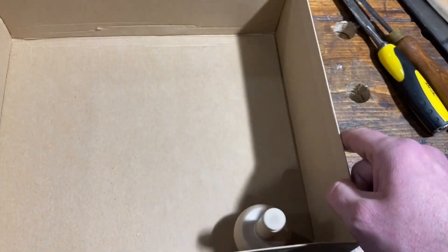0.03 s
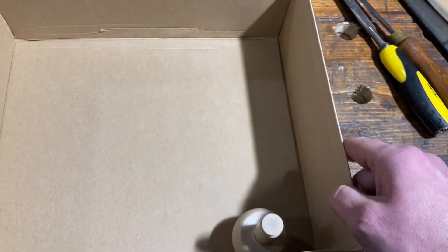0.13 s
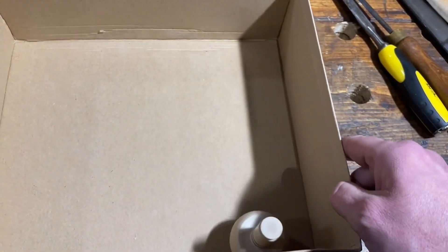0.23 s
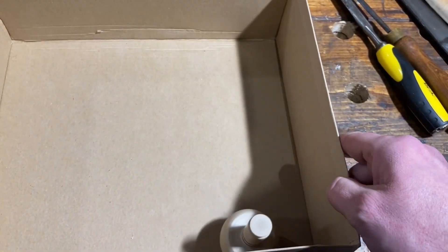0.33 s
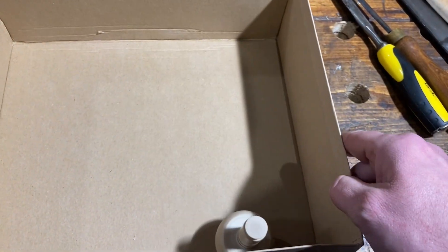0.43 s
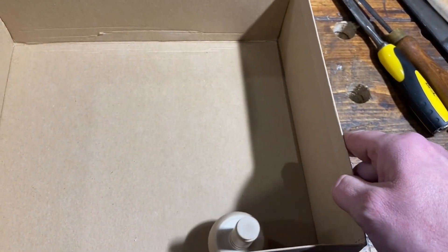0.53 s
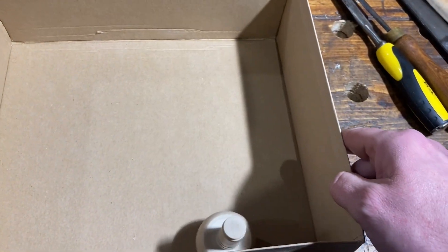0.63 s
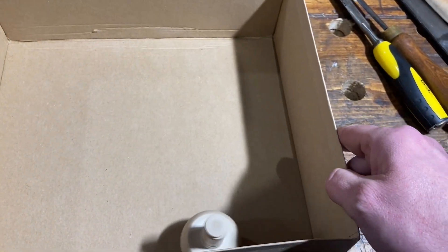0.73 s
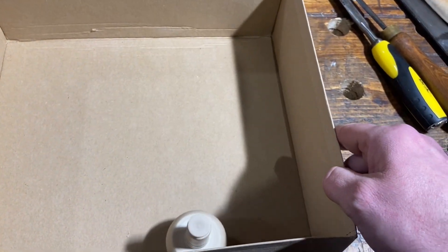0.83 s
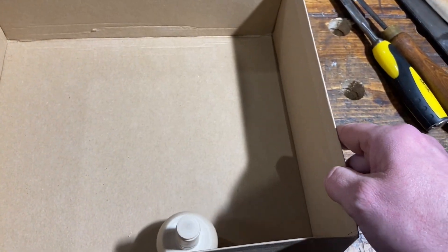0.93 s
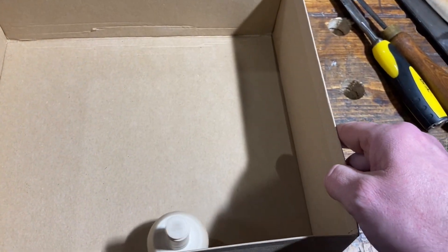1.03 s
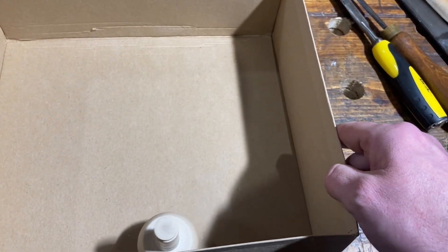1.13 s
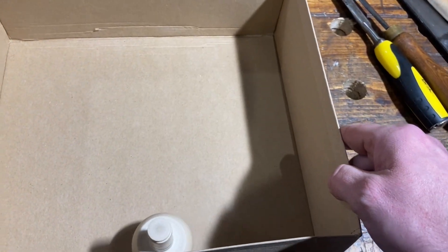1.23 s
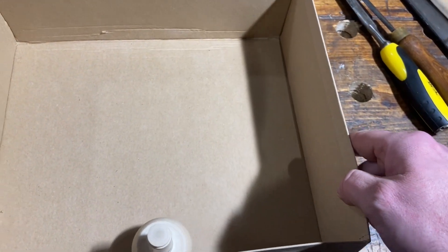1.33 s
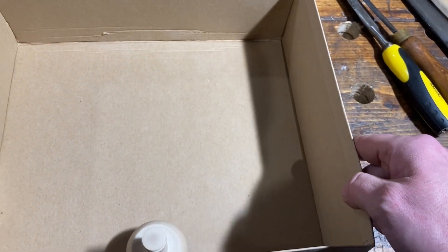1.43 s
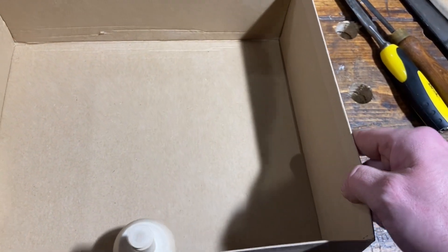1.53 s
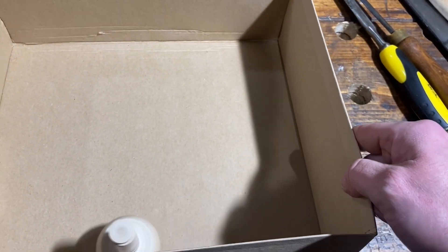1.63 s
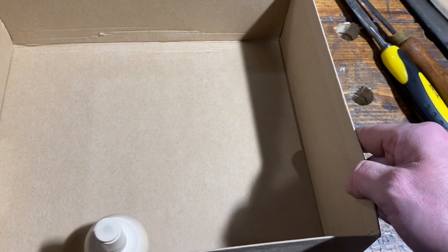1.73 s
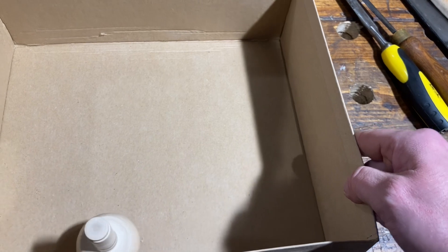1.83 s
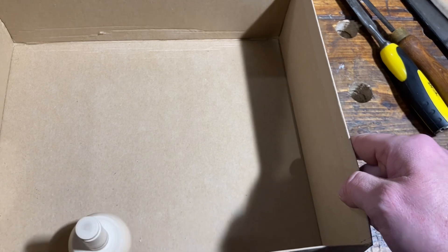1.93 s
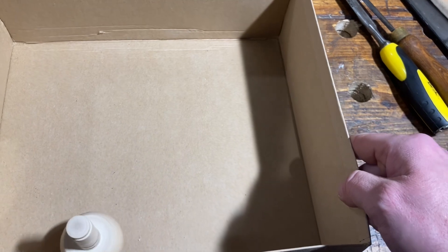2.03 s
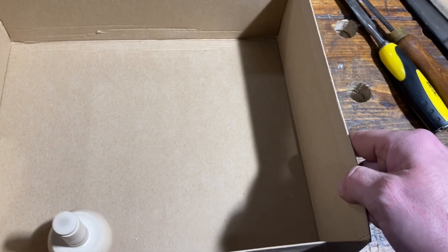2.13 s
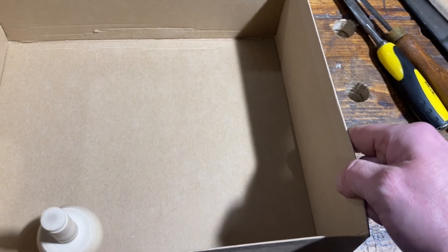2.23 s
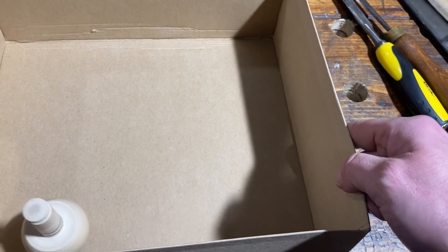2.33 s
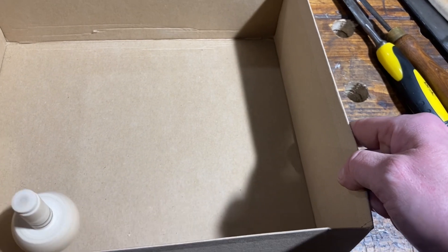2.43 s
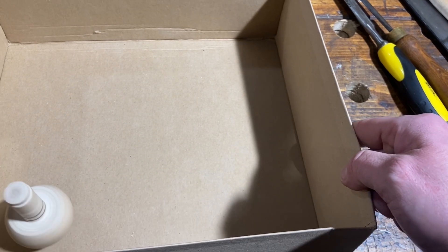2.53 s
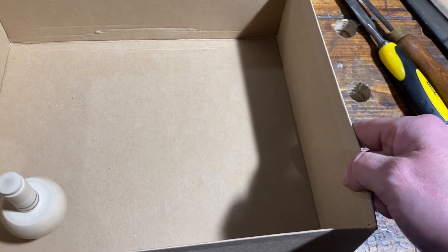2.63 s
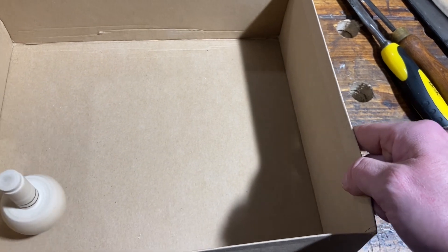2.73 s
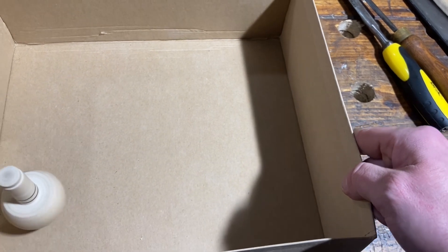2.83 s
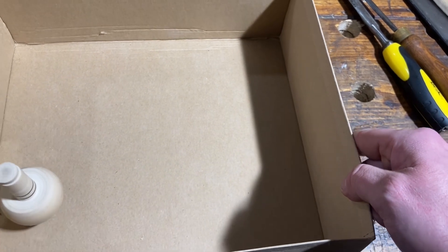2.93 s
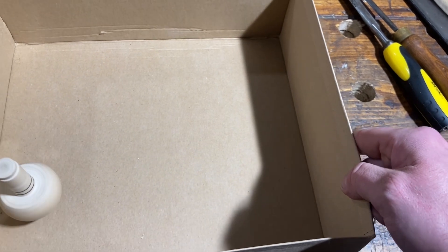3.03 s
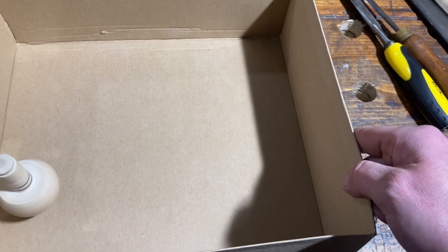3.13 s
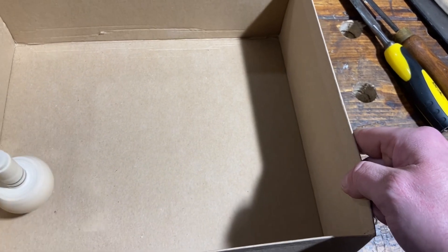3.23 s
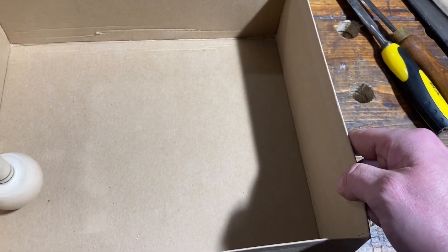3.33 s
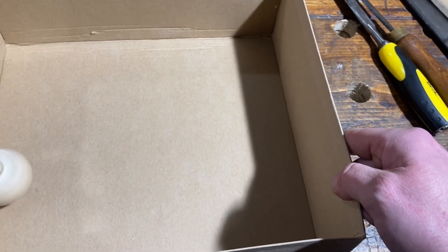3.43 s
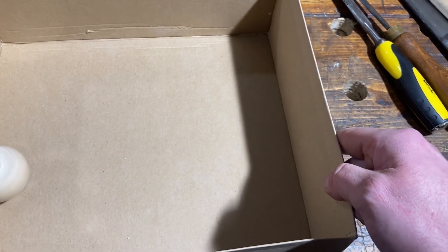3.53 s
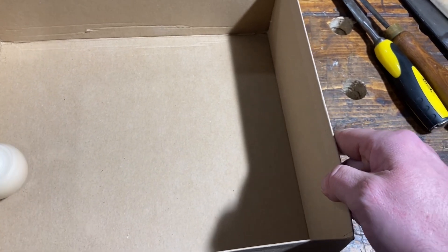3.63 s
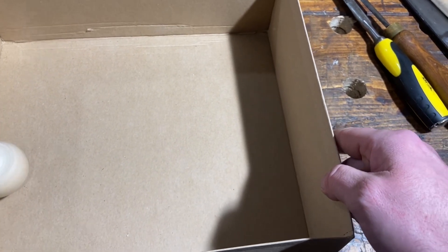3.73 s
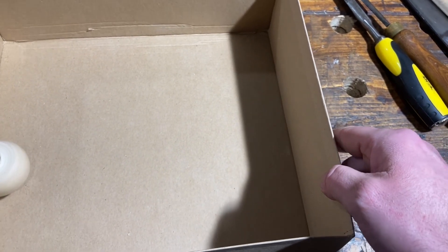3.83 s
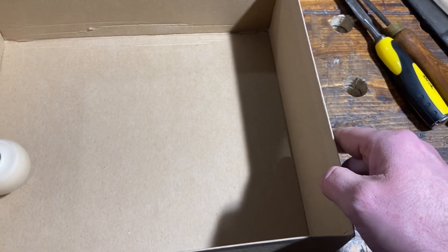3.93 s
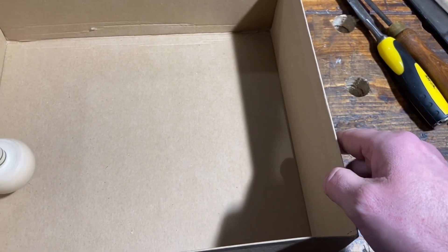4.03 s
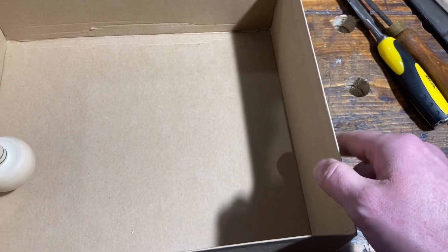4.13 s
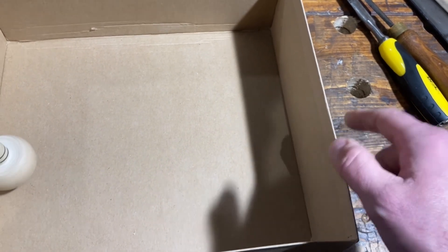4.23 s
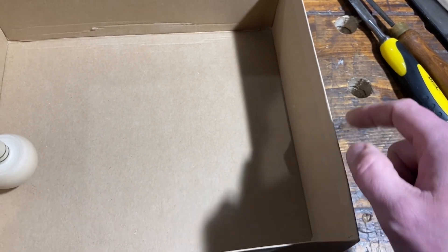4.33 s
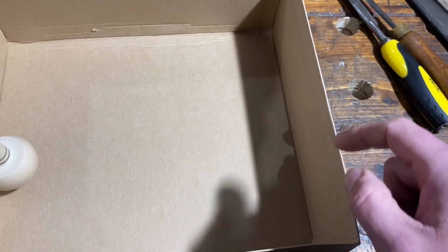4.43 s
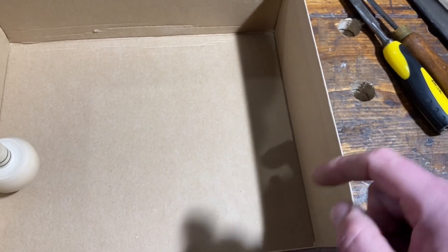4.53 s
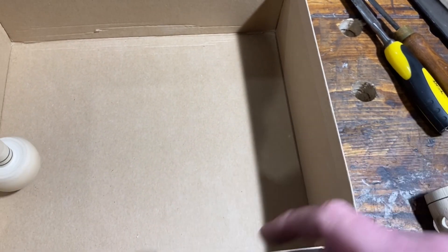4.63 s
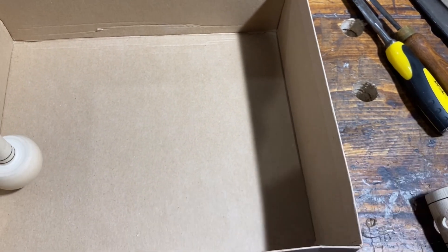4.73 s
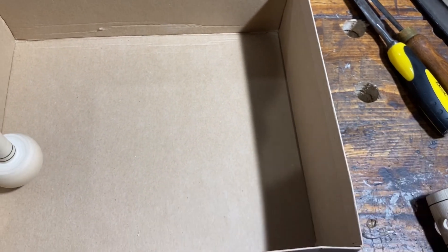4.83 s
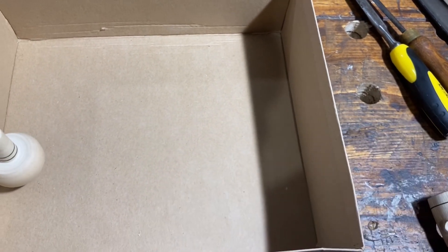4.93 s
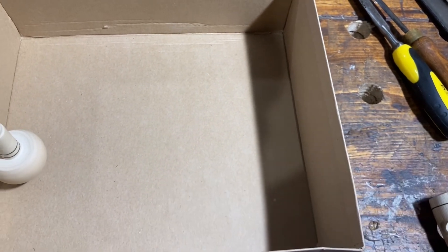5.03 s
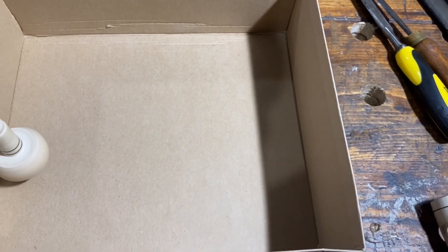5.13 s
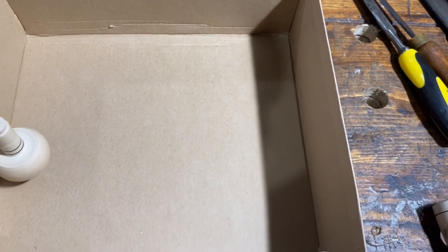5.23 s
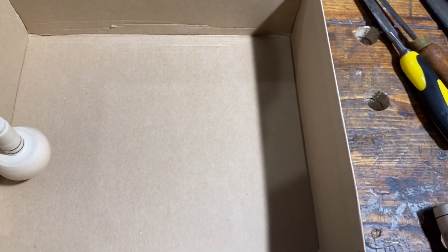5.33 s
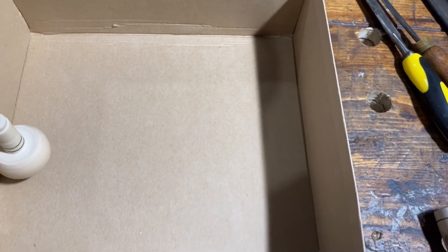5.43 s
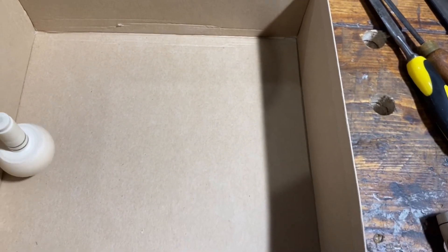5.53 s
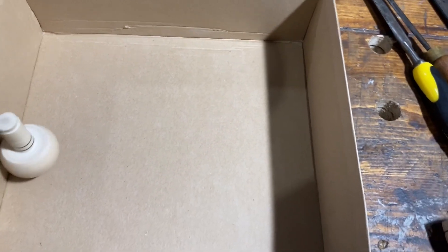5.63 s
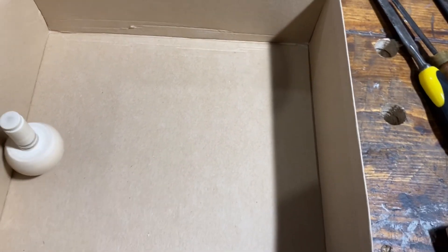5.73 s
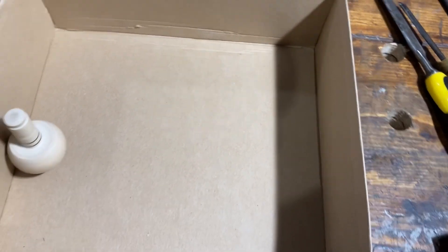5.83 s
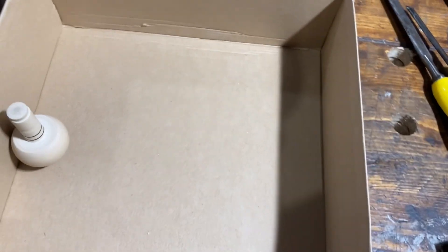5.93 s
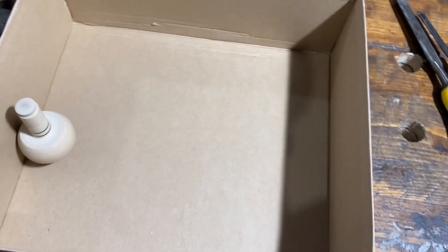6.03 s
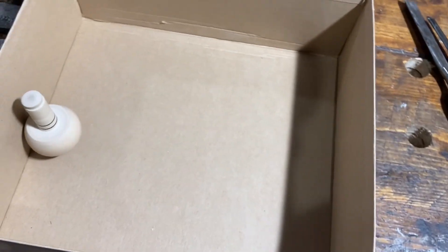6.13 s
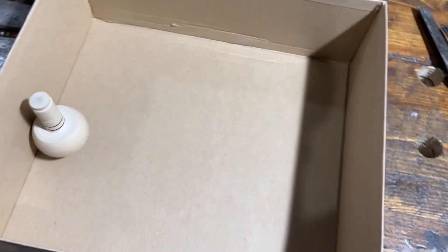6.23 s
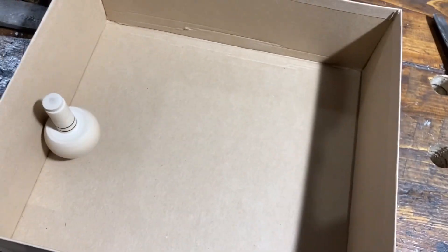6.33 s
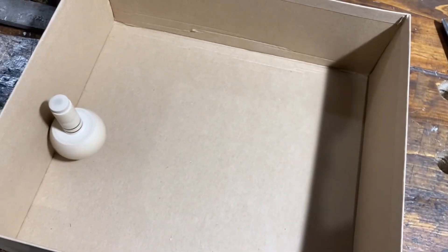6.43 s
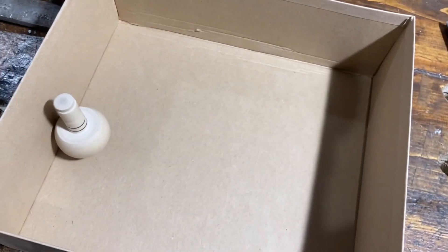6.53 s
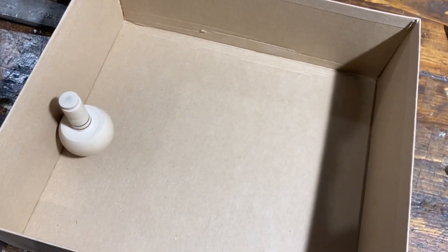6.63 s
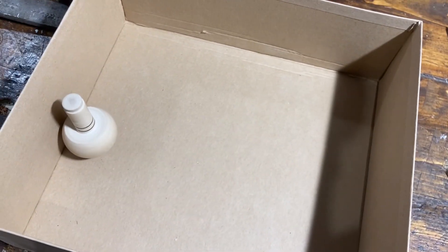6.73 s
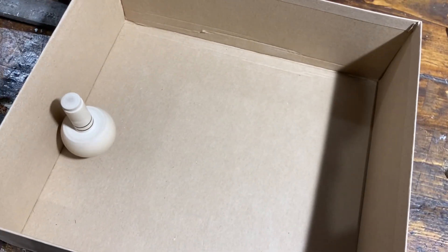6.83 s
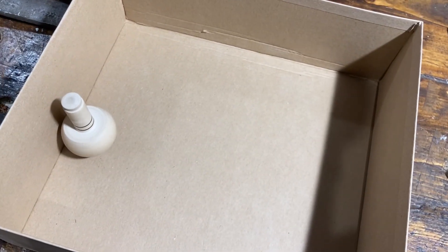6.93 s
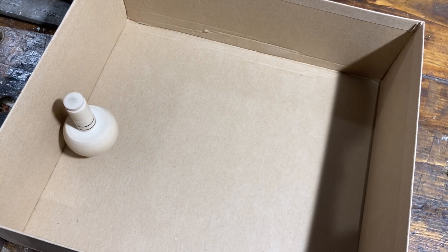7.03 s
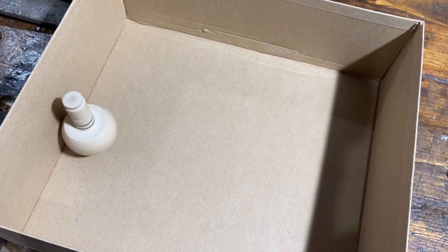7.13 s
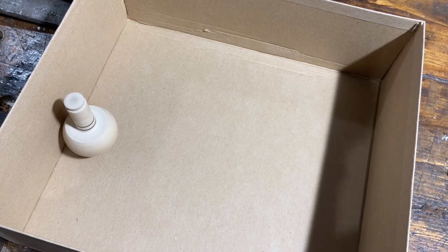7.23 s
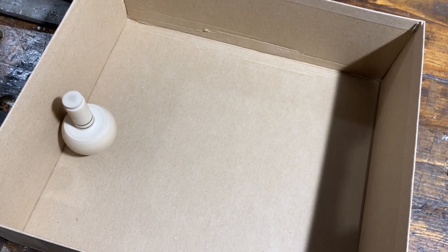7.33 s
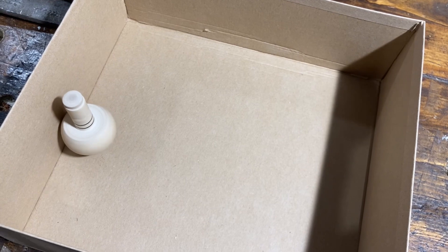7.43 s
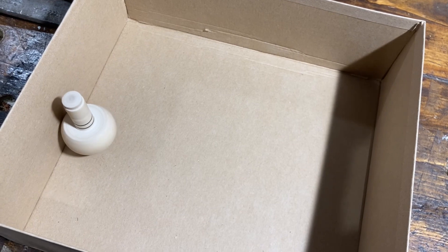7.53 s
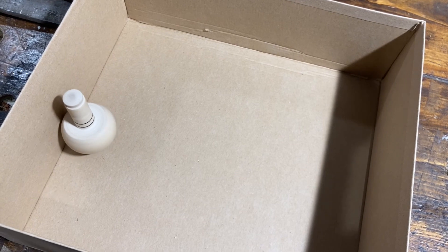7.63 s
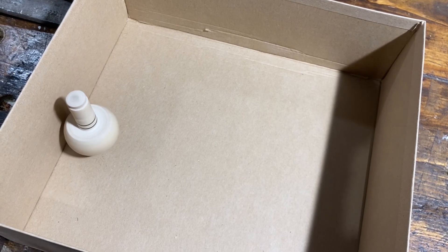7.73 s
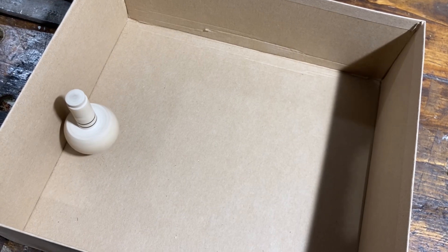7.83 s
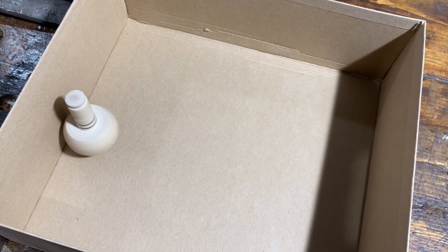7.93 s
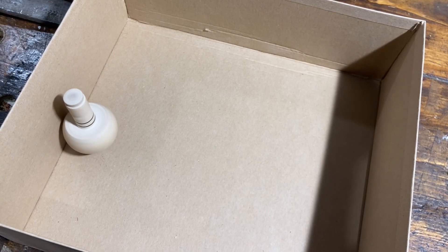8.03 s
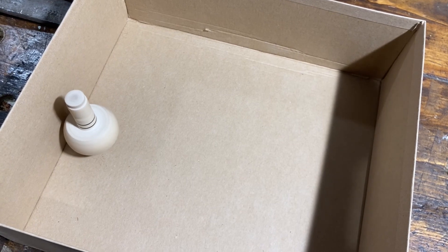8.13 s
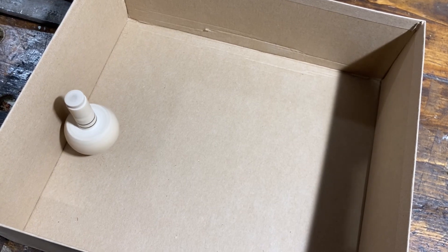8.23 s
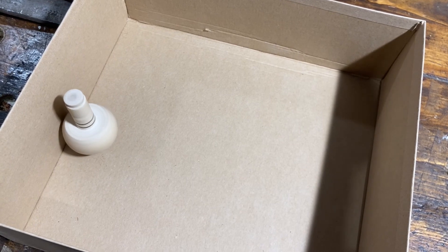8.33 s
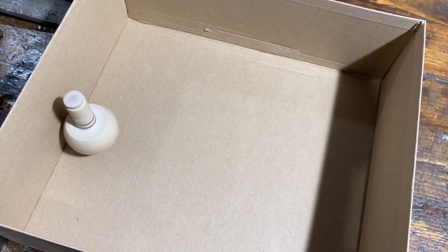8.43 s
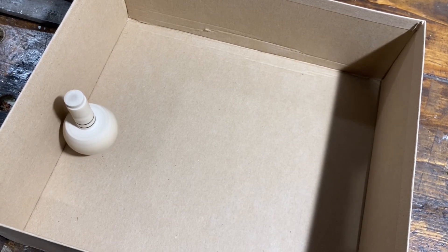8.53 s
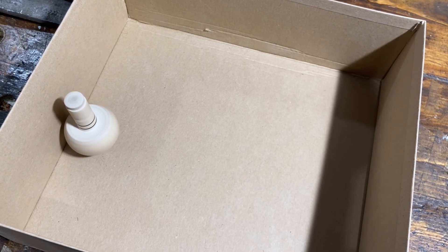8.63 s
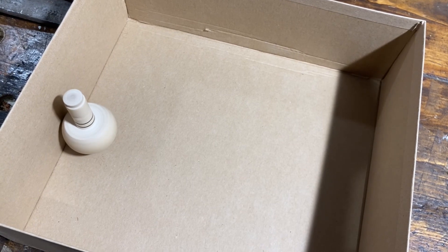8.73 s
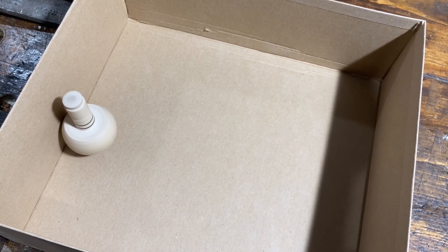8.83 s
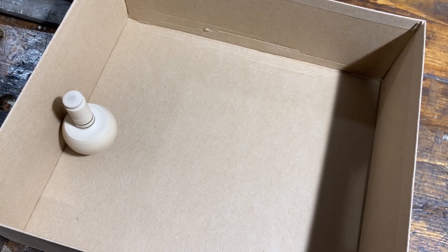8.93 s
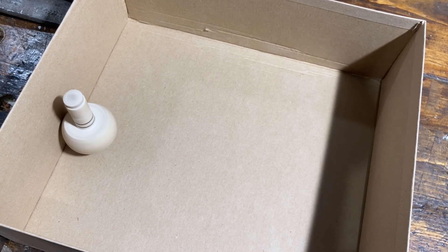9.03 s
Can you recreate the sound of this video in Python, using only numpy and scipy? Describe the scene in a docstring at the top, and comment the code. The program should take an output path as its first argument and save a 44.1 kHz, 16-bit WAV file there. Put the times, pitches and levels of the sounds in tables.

```python
"""Short rasps on cardboard come first, often several turns in a row, over the whirr of a spinning wooden top.
The top runs in a cardboard box on a workbench, close to a pair of microphones, and slowly loses speed.
Its tip grinds, skids and plucks over the box floor: filtered grainy noise, with a hum that follows the spin.
Its rim grazes the front wall, then the left: each stick-slip burst and shove rings that wall's resonances.
Dull bumps, brushing nods, a swelling hiss and steady room air fill in the rest."""
import sys
import numpy as np
from scipy import signal
from scipy.fft import rfft, irfft, next_fast_len
from scipy.io import wavfile

SR = 44100
rng = np.random.default_rng(int(sys.argv[2]) if len(sys.argv) > 2 else 0)


def transcribe(signal):
    """Save signal, clipped to [-1, 1], as a 16-bit WAV file at the path in sys.argv[1]."""
    frames = np.atleast_2d(signal).T
    limited = np.clip(frames, -1, 1)
    pcm = np.round(limited * 32767).astype(np.int16)
    wavfile.write(sys.argv[1], SR, pcm)


N = 400862
TIME = np.arange(N) / SR
CORNER_S = 2.5   # the top rounds the corner from the front wall to the left wall


def from_db(db):
    """Decibels to an amplitude factor."""
    return 10 ** (np.asarray(db) / 20)


def rms_one(x):
    """Scale a signal to an RMS of 1."""
    return x / np.sqrt(np.mean(x ** 2) + 1e-20)


def in_time(rows):
    """Each column of a curve at every sample."""
    s, *columns = np.transpose(rows)
    return [np.interp(TIME, s, column) for column in columns]


def swell(s, half_length):
    """A smooth rise and fall of height 1."""
    return np.exp(-np.minimum(((TIME - s) / half_length) ** 2, 50))


def add(out, s, sound):
    """Mix a short sound in at a time."""
    start = max(round(s * SR), 0)
    out[..., start:start + sound.shape[-1]] += sound[..., :N - start]


def lowpass(x, hz, order=2):
    """Take the treble off."""
    return signal.sosfilt(signal.butter(order, min(hz, .45 * SR), fs=SR, output="sos"), x)


def highpass(x, hz):
    """Take the bass off."""
    return signal.sosfilt(signal.butter(2, hz, "high", fs=SR, output="sos"), x)


def bandpass(x, low_hz, high_hz):
    """Keep one band."""
    return signal.sosfilt(signal.butter(2, [low_hz, high_hz], "band", fs=SR, output="sos"), x)


def waver(depth_db, hz):
    """A random level curve in dB that moves no faster than about this rate."""
    return depth_db * rms_one(lowpass(rng.standard_normal(N), hz))


def convolve(x, response):
    """Causal filtering, channel by channel."""
    return signal.oaconvolve(np.atleast_2d(x), np.atleast_2d(response), axes=1)[:, :N]


def causal(gain):
    """The promptest impulse response that has this gain over frequency."""
    cepstrum = irfft(np.log(gain + 1e-9))
    half = len(cepstrum) // 2
    cepstrum[1:half] *= 2
    cepstrum[half + 1:] = 0
    return irfft(np.exp(rfft(cepstrum)))


def body(spectrum, modes=(), size=16384):
    """Impulse response of a broad spectrum with resonances standing out of it."""
    hz = np.arange(size // 2 + 1) * SR / size + 1e-3
    points = np.array(spectrum)
    power = from_db(np.interp(np.log(hz), np.log(points[:, 0]), points[:, 1])) ** 2
    for centre, width, level in modes:
        detuning = (hz ** 2 - centre ** 2) / (hz * width)
        power = power + from_db(level) ** 2 / (1 + detuning ** 2)
    return causal(np.sqrt(power))


# colour of the room air: (frequency [Hz], relative level [dB])
AIR_COLOUR = [(20, -29), (42, -1.5), (70, 21.5), (150, 8), (500, 1.5), (1100, -6.5), (2000, -10.5),
              (3200, 0.5), (5000, -48.5), (16000, -75)]
AIR_DB = -65   # RMS level


def room_air():
    """Steady filtered noise, alike at both microphones in the bass, separate higher up."""
    apart = highpass(rng.standard_normal((2, N)), 630)
    shared = lowpass(rng.standard_normal(N), 290)
    return from_db(AIR_DB) * rms_one(convolve(apart + shared, body(AIR_COLOUR)))


# colour of the soft high hiss: (frequency [Hz], relative level [dB])
HISS_COLOUR = [(500, -25), (2900, -4), (4200, -3), (5500, -8), (7500, 0), (15500, -2)]
# swells of the hiss: (time of the height [s], half length [s], level before the trim [dB])
HISS_SWELLS = [(0.947, 0.074, -50), (1.802, 0.072, -71), (4.547, 0.32, -67.5), (4.993, 0.16, -52),
               (5.607, 0.44, -64.5), (7.345, 0.23, -63), (7.837, 0.37, -62), (9.002, 0.88, -63.5)]
HISS_REST_DB = -84.5   # between swells, before the trim


def hiss(trim_db):
    """Soft high noise whose swells add in power to a resting level."""
    power = from_db(HISS_REST_DB) ** 2
    for s, half_length, level_db in HISS_SWELLS:
        power = power + (from_db(level_db) * swell(s, half_length)) ** 2
    noise = rms_one(convolve(rng.standard_normal((2, N)), body(HISS_COLOUR)))
    return from_db(trim_db) * np.sqrt(power) * noise


def echoes(t60, gap_s, dull_hz):
    """Dense reflections that die away, different at each microphone; the furniture soaks up the treble."""
    t = TIME[:SR // 4]
    decay = from_db(-60 * t / t60) * (1 - np.exp(-(t / gap_s) ** 2))
    tail = rng.standard_normal((2, len(t))) * decay
    return lowpass(tail / np.sqrt(np.sum(tail ** 2, axis=1, keepdims=True)), dull_hz)


def space(room_db, thud_db, diffuse_hz):
    """Direct sound, then reflections of workshop, bench and box; the dull workshop tail lasts longest."""
    path = from_db(room_db) * lowpass(echoes(t60=.19, gap_s=.006, dull_hz=3400), 3400)
    # a bright slap off the bench, the same at both microphones
    path = path + from_db(-6.5) * echoes(t60=0.094, gap_s=0.0011, dull_hz=13200)[0]
    # the box walls reflect differently to each microphone
    path = path + from_db(-45.5) * echoes(t60=0.027, gap_s=0.00052, dull_hz=11800)
    # long waves reach both microphones alike
    shared = from_db(thud_db) * echoes(t60=0.15, gap_s=0.0087, dull_hz=diffuse_hz)[0]
    path = highpass(path, diffuse_hz) + shared
    path[:, 0] += 1   # direct sound
    return path


def boom(x, hz, width_hz, level_db):
    """A low mode of the room builds up slowly after each knock."""
    return from_db(level_db) * bandpass(x, hz - width_hz / 2, hz + width_hz / 2)


def thump(hz, level_db, peak_s):
    """A short low tone that swells and dies."""
    t = TIME[:SR // 4]
    envelope = t / peak_s * np.exp(1 - t / peak_s)
    return from_db(level_db) * envelope * np.sin(2 * np.pi * hz * t)


# soft dull bumps of the box: (time [s], frequency [Hz], level [dB], time to the peak [s])
BOX_BUMPS = [(0.125, 246, -57, 0.018), (1.716, 66.5, -43.5, 0.016), (5.69, 132, -52.5, 0.019),
             (5.773, 248, -61, 0.033), (5.845, 373, -56, 0.024), (6.19, 272, -61.5, 0.042),
             (6.215, 69.4, -53, 0.014), (6.435, 149, -56, 0.013), (6.655, 64, -41, 0.012),
             (7.5, 132, -58, .02), (7.628, 62.4, -40.5, 0.02)]
# the near corner rings with each touch until the top has left it; its level is relative to the touch
CORNER_RING_HZ, CORNER_RING_DB, CORNER_RING_S, CORNER_LEFT_S = 604, -7.5, 0.0026, 0.72
NOD_S, NODS_FROM_S = 0.072, 8.31   # the slowing top nods at this period; from this time six nods thump
NOD_HZ, NOD_DB, NOD_PEAK_S = 135.3, -56, 0.021   # the thump of one nod


def bumps():
    """Dull thumps of the box: stray ones, the ring of the near corner, and the nods of the top."""
    out = np.zeros(N)
    for s, hz, level_db, peak_s in BOX_BUMPS:
        add(out, s, thump(hz, level_db, peak_s))
    for s, level_db, *_ in touches():
        if s < CORNER_S:
            nearness = np.exp(-(s / CORNER_LEFT_S) ** 4)
            add(out, s, nearness * thump(CORNER_RING_HZ, level_db + CORNER_RING_DB, CORNER_RING_S))
    for k in range(6):
        add(out, NODS_FROM_S + k * NOD_S, thump(NOD_HZ, NOD_DB, NOD_PEAK_S))
    return out


NOD_DEPTH = .3   # share by which the brushing swells on each nod
BRUSH_UNEVEN_DB = 1.3   # slow waver of the brushing


def nodding(brush_db, low_hz, high_hz, height_s, half_length_s, uneven_db):
    """Late in the spin the tip brushes the cardboard, a little harder on every nod."""
    nod = 1 + NOD_DEPTH * np.cos(2 * np.pi * (TIME - NODS_FROM_S - NOD_PEAK_S) / NOD_S)
    brush = rms_one(bandpass(rng.standard_normal((2, N)), low_hz, high_hz))
    uneven = from_db(waver(uneven_db, 2.9))
    return from_db(brush_db) * swell(height_s, half_length_s) * uneven * nod * brush


SPIN_HZ, DRAG_HZ_PER_S = 81.24, .65   # the spin runs down steadily (turns per s)
EXTRA_SPIN_HZ, BRAKE_S = 9.5, 1.05   # the front wall brakes away the first extra speed


def spin(s):
    """Turns per second at a given time."""
    return SPIN_HZ - DRAG_HZ_PER_S * s + EXTRA_SPIN_HZ * np.exp(-s / BRAKE_S)


def tip_load(angle):
    """The tip presses harder once a turn, with a random flutter on top."""
    throb = np.exp(.55 * np.cos(angle))
    return rms_one(throb * from_db(waver(1.8, 35.0)))


# hum of the unbalanced top: (multiple of the spin, relative level [dB])
HUM_HARMONICS = [(1, -13.5), (2, -8.5), (3, -15.5), (4, -15)]
# the hum swells, then fades as the top settles upright: (time [s], level before the trim [dB])
HUM_LEVEL = [(0, -81), (.6, -38.5), (1.05, -39), (1.3, -59), (2.6, -55), (3.3, -58), (9, -63.5)]


def unbalance_hum(angle, trim_db):
    """Sines at multiples of the spin, each wavering slightly in level."""
    level_db, = in_time(HUM_LEVEL)
    hum = np.zeros(N)
    for k, harmonic_db in HUM_HARMONICS:
        hum += from_db(harmonic_db + waver(0.61, 2.5)) * np.sin(round(k) * angle)
    return from_db(level_db + trim_db) * hum


# colour of the rumble: (frequency [Hz], relative level [dB])
RUMBLE_COLOUR = [(20, -49.5), (45, -12.5), (100, -16), (400, -16.5), (900, -61.5), (4000, -68)]
# resonances of the rumble: (frequency [Hz], width [Hz], relative level [dB])
RUMBLE_MODES = [(59, 16, 2), (81.4, 7.4, 6), (140, 28, -4.5), (207, 45, 1), (249.4, 9.7, 4),
                (302, 18, -2.5)]


def floor_rumble(level_db):
    """The shaken box floor: noise through its low resonances."""
    shaking = convolve(rng.standard_normal(N), body(RUMBLE_COLOUR, RUMBLE_MODES))
    return from_db(level_db) * rms_one(lowpass(shaking, 320))


# colour of the whirr: (frequency [Hz], relative level [dB])
WHIRR_COLOUR = [(100, -42.5), (400, -27.5), (1300, -9.5), (2600, -4.5), (4200, -6), (8000, -7),
                (16000, -17)]
# resonances of the box floor: (frequency [Hz], width [Hz], relative level [dB])
FLOOR_MODES = [(458, 37, -1.5), (685, 95, -5), (934, 13, 7), (1228, 56, -2), (1530, 500, -8.5),
               (2020, 90, 0)]


def floor_whirr(grit, level_db):
    """Tiny catches of the tip ring the box floor."""
    return from_db(level_db) * rms_one(convolve(grit, body(WHIRR_COLOUR, FLOOR_MODES)))


# the tip skids in fluttering bursts and the floor's ring slides:
# (time of the strongest burst [s], half length [s], frequency [Hz], slide [Hz per s], half width [Hz], level [dB])
SKID_BURSTS = [(1.631, 0.027, 940, -72, 220, -56), (1.713, 0.076, 980, -30, 130, -53.5),
               (2.0, 0.58, 940, -32, 32, -63.5), (2.274, 0.013, 1000, -100, 247, -56),
               (2.43, 0.1, 900, -200, 130, -54.5), (2.563, 0.083, 830, -280, 149, -56.5),
               (2.726, .11, 830, -280, 226, -61.5), (3.296, .14, 1700, 194.5, 460, -64)]
FLUTTER_S, FLUTTER_DB = 0.065, 3.5   # the fast top nods at this period, pressing the tip down each time


def skids(grit):
    """A resonance whose centre follows the tip's place on the floor, pulsing with each nod."""
    out = np.zeros(N)
    for s, half_length, hz, hz_per_s, half_width_hz, level_db in SKID_BURSTS:
        near = abs(TIME - s) < 3 * half_length
        t = TIME[near] - s
        carrier = np.exp(2j * np.pi * np.cumsum(hz + hz_per_s * t) / SR)
        # shift the band to zero, narrow it there, shift it back
        ring = rms_one(np.real(lowpass(grit[near] / carrier, half_width_hz) * carrier))
        flutter_db = FLUTTER_DB * np.cos(2 * np.pi * t / FLUTTER_S)
        out[near] += from_db(level_db + flutter_db) * np.exp(-(t / half_length) ** 2) * ring
    return out


# colour of the low rub: (frequency [Hz], relative level [dB])
DRAG_COLOUR = [(80, -53), (220, 11), (330, 0.5), (480, -2), (620, -8.5), (1200, -2), (1800, -11),
               (5000, -29.5)]
# course of the low rub: (time [s], level before the floor's patches [dB])
DRAG_LEVEL = [(0, -67), (1.4, -58), (1.7, -56.5), (2.15, -62), (2.3, -55.5), (2.62, -59), (2.88, -66),
              (3.35, -59), (4.3, -83), (7, -80.5), (8.85, -73), (9.02, -81), (9.09, -60)]
CATCHES_PER_S, CATCH_SPREAD_DB = 260, 11   # plucked fibres at a load of 1, and the spread of their sizes
PATCHY_DB, PATCHES_HZ = 3, 11   # rough and smooth patches of the floor pass under the tip


def dragging(load):
    """While the tip travels it plucks fibres at random, more of them under load: a grainy low rub."""
    level_db, = in_time(DRAG_LEVEL)
    caught = rng.random(N) < CATCHES_PER_S * load / SR
    sizes = from_db(CATCH_SPREAD_DB * np.minimum(rng.exponential(1, N), 2)) * rng.choice([-1, 1], N)
    patches = from_db(waver(PATCHY_DB, PATCHES_HZ))
    return patches * from_db(level_db) * rms_one(convolve(caught * sizes, body(DRAG_COLOUR)))


# tip on the floor of the box: (time [s], rumble level before the trim [dB], whirr level before the trim [dB])
TIP_LEVELS = [(0, -43.5, -46), (.33, -53, -61), (.55, -55, -55.5), (1.4, -50, -56), (1.62, -48, -49),
              (2.15, -58, -54), (2.55, -48.5, -52.5), (2.88, -64, -56.5), (3.42, -58, -54),
              (4.1, -55.5, -53.5), (4.45, -67, -58.5), (4.85, -62, -57), (5.06, -54, -52),
              (5.25, -57.5, -62), (6.35, -64.5, -66.5), (6.7, -64, -60.5), (7.4, -67, -64), (8.8, -78, -74),
              (9.02, -76, -60), (9.09, -54, -46)]
GRAIN_DB = 4   # spread of the tiny catches that make the whirr


def tip(grain_db, whirr_db, rumble_db, hum_db):
    """The tip grinds over the fibres, harder once a turn, and the unbalance shakes the floor of the box."""
    rumble_level, whirr_level = in_time(TIP_LEVELS)
    angle = 2 * np.pi * np.cumsum(spin(TIME)) / SR
    load = tip_load(angle)
    grit = load * rng.standard_normal(N) * from_db(grain_db * rng.standard_normal(N))
    grinding = floor_whirr(grit, whirr_level + whirr_db) + skids(grit) + dragging(load)
    shaking = floor_rumble(rumble_level + rumble_db) + unbalance_hum(angle, hum_db)
    return grinding + shaking


# the rim meets a wall and touches it once a turn: (time [s], first touch, relative level [dB],
# change to the last touch [dB], touches [count], contact length [units of 1.4 ms],
# shove against the rasp [dB], brightness before the touch's own tilt [dB per octave],
# band that the spot favours or damps [Hz], by [dB])
RIM_GRAZES = [(0.0129, -18.5, 0, 1, 1.7, 2, -0.5, 575, 1), (0.2718, -19, 4, 1, 5.1, -4.5, -2, 895, -9),
              (0.4636, -26, 18, 1, 3.1, 4, 0, 2510, 4.5), (.595, -22, -1, 2, 3, 6, 1.5, 3800, -4.5),
              (0.619, -32, 3.5, 3, 3.1, 13, 4, 1350, -7), (0.668, -32, 9, 2, 2.9, 1, .5, 3900, -11),
              (0.7471, -23, 0, 3, 6.4, -0.5, 0, 3380, -4), (0.8578, -22.5, 7, 1, 1.3, 17, 3.5, 5300, -24),
              (0.8796, -24.5, 7, 1, 6.4, -9, -2, 1020, 3), (.905, -26, -2, 3, 4.6, 3, 1.5, 1000, 10),
              (0.9417, -22, -4.5, 4, 2.8, 9, 2, 560, -5.5), (0.9888, -18.5, -3.5, 1, 3.9, -12, 1, 570, 1),
              (1.039, -21.5, 0, 2, 2.7, 2, 1.5, 2000, 0.5), (1.136, -25.5, 4.5, 2, 3.15, -7.5, 0, 630, -7),
              (1.329, -23.5, 2, 2, 4.3, -6, 0, 4750, 4), (1.416, -33, 13, 2, 1.85, -2, -0.5, 640, -11),
              (3.452, -13, 2, 1, 7, -22, -.5, 1640, 6), (3.4581, -11.5, 0, 1, 4.9, 0, 0.5, 1500, 1),
              (3.589, -10, -10.5, 2, 5, -4, -0.5, 900, -2),
              (3.6413, -22, -2, 2, 3.9, -6.5, -2.5, 850, -6.5),
              (3.6942, -28.5, 8.5, 2, 5.6, -1, -1, 4400, -5),
              (3.758, -22, -3.5, 2, 3.7, 0.5, -1.5, 4150, 2),
              (3.8104, -22.5, -1.5, 2, 2.9, -6, -2.5, 927, -10.5),
              (3.8621, -24, 6, 2, 4, -6.5, -1, 4200, -2), (3.9397, -23.5, 13, 1, 3.2, 3, -1, 1436, 1),
              (4.043, -44, 0, 1, 3.5, -7.5, 5, 4200, -26), (4.2255, -20, 5, 2, 5.5, 1.5, -0.2, 1900, -1),
              (4.5396, -21.5, 1.5, 2, 7, -0.5, -1.5, 766, 0.5),
              (4.647, -28.5, 12, 2, 5.5, 2.5, -0.5, 470, -2.5), (4.966, -24, 3.5, 2, 4.1, -5, -1.5, 760, 3),
              (5.111, -16, -11.5, 2, 4.7, -5, -1.25, 4240, -4.5), (5.477, -23, -6, 1, 3.5, 0, -1, 622, 7),
              (5.6992, -46.5, -15, 1, .88, 10, 1, 1500, -2), (5.7767, -45, -13, 1, 5.2, -6, -4.5, 1500, -8),
              (6.0587, -25, 3, 2, 5.9, 2.5, -1.57, 4750, -8.5),
              (6.4601, -30, 10.5, 2, 3.2, -4.5, -1.5, 506, -4.5),
              (6.6347, -15.5, 0, 1, 4.7, -3.5, -0.8, 6500, -3.5),
              (7.6226, -16.5, 6, 1, 5.8, 0.5, -0.4, 2130, 2)]
EARLY_MS_PER_DB = 0.3   # a harder touch comes earlier in its turn
MID_RUN_SAG_DB = 1.5   # the middle touches of a run are lighter
FIRST_TILT, LATER_TILT = 0.64, -0.044   # brightness added to the first touch and to later ones (dB per octave)


def touches():
    """Each graze unrolled into one touch a turn: time, level, then the shape that graze() takes."""
    for s, first_db, change_db, count, length, shove_db, brightness, spot_hz, spot_db in RIM_GRAZES:
        for turn, part in enumerate(np.linspace(0, 1, max(round(count), 1))):
            level_db = first_db + change_db * part - MID_RUN_SAG_DB * np.sin(np.pi * part)
            when = s + turn / spin(s) - EARLY_MS_PER_DB * 1e-3 * change_db * part
            tilt = brightness + (LATER_TILT if turn else FIRST_TILT)
            yield when, level_db, length, tilt, shove_db, spot_hz, spot_db


def rubbing(rub_db, rub_s, low_hz, lean_db, lean_at_s, lean_half_s):
    """The rim brushes the wall lightly after each touch, harder while the top leans on the front wall."""
    kicks = np.zeros(N)
    for s, level_db, *_ in touches():
        add(kicks, s, from_db([level_db]) ** 2)
    # each kick's power dies away exponentially
    weight = np.sqrt(signal.lfilter([1], [1, -np.exp(-1 / (rub_s * SR))], kicks + 1e-18))
    brush = highpass(highpass(rng.standard_normal(N), low_hz), low_hz)
    return from_db(rub_db + lean_db * swell(lean_at_s, lean_half_s)) * weight * brush


CHATTER_SHARE = .15   # how regular the slips within one contact are


def rasp(size, chatter_hz, regular):
    """Stick and slip: much the same catch repeats at a rate of its own in each contact."""
    period = int(SR / (chatter_hz * rng.uniform(.8, 1.5)))
    catches = np.resize(rng.standard_normal(size)[:period], size)
    return np.sqrt(regular) * catches + np.sqrt(1 - regular) * rng.standard_normal(size)


SHOVE_AT_S = 0.00393   # the wall gives way a moment after the first catch
SPOT_OCTAVES = 0.32   # half width of the band that a spot favours or damps


def graze(length, brightness, shove_db, spot_hz, spot_db, push_hz, box_db, apart_db, size=4096):
    """Force of one contact: the rim shoves the wall while its grain catches and slips on the fibres."""
    t = TIME[:size]
    progress = t / (max(length, 1) * 0.0014)
    pressure = (1 - np.exp(-(progress / 0.34) ** 2)) * np.exp(-progress ** 4)
    slips = rasp(size, chatter_hz=654.3, regular=CHATTER_SHARE) * pressure
    slips = slips / np.linalg.norm(slips)
    # the sound bounces round the box, differently from every spot and a little differently to each microphone
    scatter = rng.standard_normal(size) + from_db(apart_db) * rng.standard_normal((2, size))
    bounces = scatter * from_db(-60 * t / 0.034) * np.minimum(progress, 1)
    bounces = lowpass(bounces / np.linalg.norm(bounces[0]), 2500, order=1)
    slips = highpass(slips + from_db(box_db) * bounces, push_hz)
    shove = from_db(shove_db) * lowpass(signal.unit_impulse(size, round(SHOVE_AT_S * SR)), push_hz)
    hz = np.clip(np.arange(size // 2 + 1) * SR / size, 200, None)
    tilt_db = brightness * np.log2(hz / 4000)
    spot_colour_db = spot_db * np.exp(-(np.log2(hz / spot_hz) / SPOT_OCTAVES) ** 2)
    return convolve(slips + shove, causal(from_db(tilt_db + spot_colour_db)))[:, :size]


# resonances of each wall: (frequency [Hz], width [Hz], relative level [dB])
FRONT_MODES = [(83, 6, -24.0), (131, 9.7, -4.5), (171, 5.6, -2), (205.2, 7.6, 11), (261, 16, -2),
               (328.4, 13, 7.5), (479, 13, 3), (572, 24, 1.7), (637, 20, 0.5), (714, 14, -7),
               (961, 30, 1.5), (1095, 45, 0.5), (1170, 59, -1.2), (1302, 49, -3), (1490, 38, -6),
               (1604, 30, -3.7), (1772, 21, -4), (1885, 33, 2.7), (2080, 43, -7), (2200, 47, -2),
               (2401, 49, 8), (3250, 130, -4), (4110, 86, 2), (4780, 89, -7.5), (7080, 179, -3),
               (10550, 130, -3), (11600, 210, 2), (14100, 284, -1.5), (15900, 310, -12)]
LEFT_MODES = [(55, 7.1, 0.5), (108, 72, -18), (190, 16, -4), (229.8, 11, 10), (247, 11, 11),
              (331, 41, -6.5), (380.3, 13, -2), (451.7, 12.8, 4.5), (628, 16, -3.8), (737, 37, 2),
              (973, 44, -1.2), (1048, 22, 1), (1239, 43, 4.5), (1352, 76, 3.7), (1462, 66, 1),
              (1866, 61, 4), (2010, 109, 4), (2270, 45, 1.5), (2460, 37, 7.0), (2670, 110, 1.5),
              (3724, 380, 0), (4100, 290, 0), (5670, 110, 3), (6010, 380, 8.5), (6370, 414, 0.7),
              (7400, 488, -4.5), (8335, 510, 1.5), (9300, 1100, 0.2), (11140, 250, 0.5), (14200, 770, -0.5)]
# broad rasp of each wall between its resonances: (frequency [Hz], relative level [dB])
FRONT_RASP = [(30, -34), (100, -29), (400, -35), (1500, -39), (2800, -9), (5000, -14.5), (8000, -8),
              (12500, -9.5), (16000, -1)]
LEFT_RASP = [(30, -34), (100, -0.5), (600, -36.5), (1700, -27), (3100, -20), (4400, 7), (7500, -27),
             (10000, -3.5), (12500, 1), (16000, -7)]
# the wood of the top itself, rung by hard blows: (frequency [Hz], width [Hz], relative level [dB])
WOOD_MODES = [(1453, 70, 13.5), (2020, 160, 9.5), (4180, 110, 10.5), (5650, 200, 1.5), (6430, 220, 17),
              (6400, 350, 21.5), (14100, 500, 3)]
SPOT_DETUNE = .008   # scatter of the wall's resonances from spot to spot (natural log of frequency)
BENCH_THUD_DB = -3   # bass reflections of the knocks


def walls(front_db, left_db, wood_db, room_db):
    """Every touch rings the wall the top runs along, hard ones the wood too; each has its own echo path."""
    sides = [(front_db, FRONT_RASP, FRONT_MODES), (left_db, LEFT_RASP, LEFT_MODES)]
    rub = rubbing(rub_db=-61, rub_s=0.097, low_hz=500, lean_db=8, lean_at_s=0.8, lean_half_s=.15)
    wood = from_db(wood_db) * body([(1000, -53.0)], WOOD_MODES)
    out = np.zeros((2, N))
    for along, (wall_db, spectrum, modes) in zip([TIME <= CORNER_S, TIME > CORNER_S], sides):
        out += from_db(wall_db) * convolve(rub * along, body(spectrum, modes))
    for s, level_db, *shape in touches():
        wall_db, spectrum, modes = sides[int(s > CORNER_S)]
        here = [(hz * np.exp(SPOT_DETUNE * rng.standard_normal()), width, db) for hz, width, db in modes]
        contact = from_db(level_db) * graze(*shape, push_hz=510, box_db=-1.5, apart_db=-4.5)
        # the wood grows with the square of the force
        ring = from_db(wall_db) * body(spectrum, here) + from_db(level_db) * wood
        path = space(room_db, thud_db=BENCH_THUD_DB, diffuse_hz=330)
        add(out, s, convolve(convolve(contact, ring), path))
    return out


def scene():
    """Room air and hiss, bumps and nods, the whirring tip, and the rim's knocks with their boom."""
    background = room_air() + hiss(trim_db=5.0)
    nods = nodding(brush_db=-66.5, low_hz=3040, high_hz=3830, height_s=8.0, half_length_s=2.8,
                   uneven_db=BRUSH_UNEVEN_DB)
    whirr = tip(grain_db=GRAIN_DB, whirr_db=-7.0, rumble_db=-4.0, hum_db=-4.0)
    whirr = convolve(whirr, space(room_db=1.0, thud_db=-7.5, diffuse_hz=480))
    knocks = walls(front_db=26.5, left_db=21.5, wood_db=18.5, room_db=-7.5)
    knocks = knocks + boom(knocks, hz=58.3, width_hz=28, level_db=7.5)
    return background + bumps() + nods + whirr + knocks


# right microphone channel, gain and lag applied to it: (frequency [Hz], gain [dB], phase lag [rad])
RIGHT_MICROPHONE = [(60, 4.2, 0), (350, 4, 0), (530, 4.2, .45), (950, 4, -.6), (1450, 4, .6),
                    (2400, 2.3, 1.6), (3600, 1, 2.2), (4300, 3.4, 2.1), (5200, .8, 2.9), (6300, -.7, 3.6),
                    (7700, 0, 5.9), (9400, 0, 6.5), (11300, 0, 9), (12800, 0, 10.2), (14000, 0, 12),
                    (16700, 0, 12.8)]
CUTOFF_HZ = 15900


def record(dry):
    """The right side has more bass and later treble; peaks are rounded, both ends of the spectrum are cut."""
    hz, gain_db, lag = np.transpose(RIGHT_MICROPHONE)
    size = next_fast_len(N + 2048)
    grid = np.arange(size // 2 + 1) * SR / size
    response = from_db(np.interp(grid, hz, gain_db)) * np.exp(-1j * np.interp(grid, hz, lag))
    right = irfft(rfft(dry[1], size) * response, size)[:N]
    pair = highpass(np.vstack([dry[0], right]), 36)
    rounded = .72 * np.tanh(pair / .72)
    return signal.sosfilt(signal.ellip(10, .2, 70, CUTOFF_HZ, fs=SR, output="sos"), rounded)


dry = scene()
out = record(dry)
transcribe(out)
```